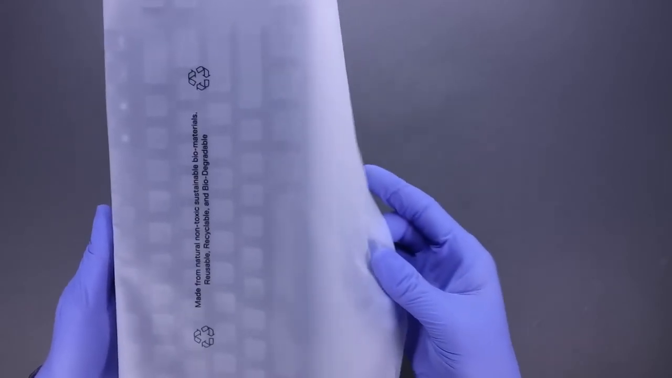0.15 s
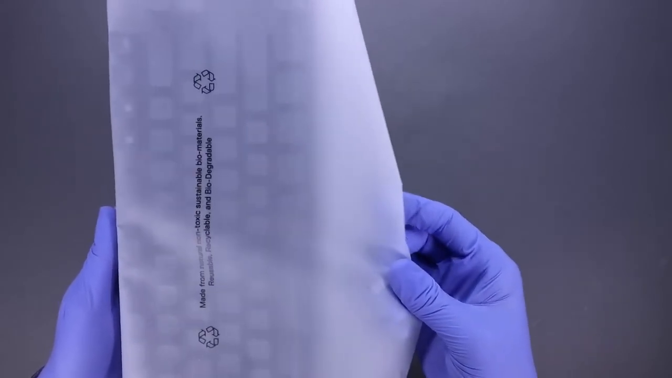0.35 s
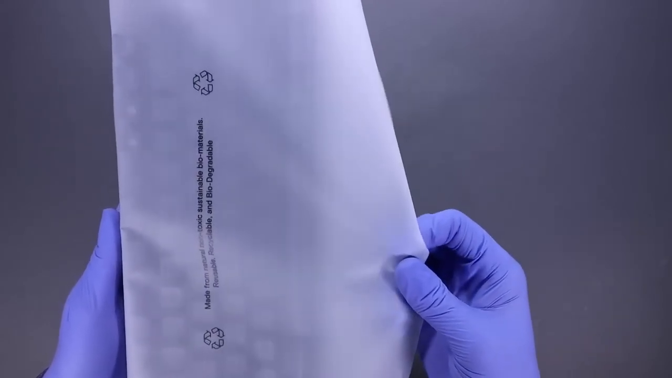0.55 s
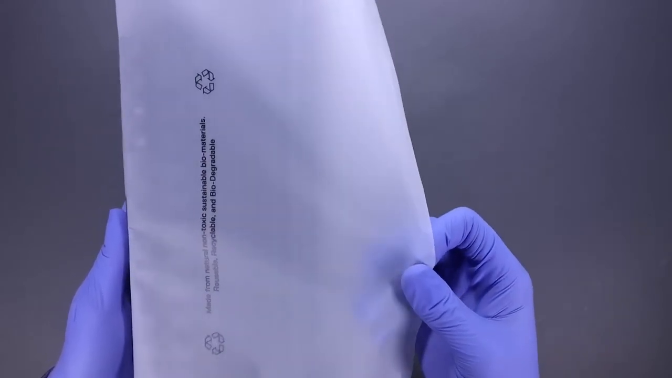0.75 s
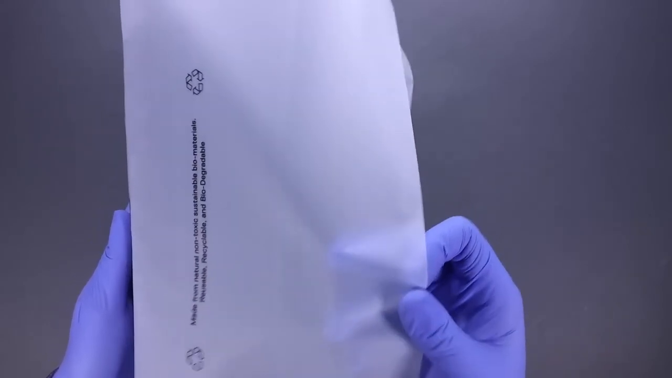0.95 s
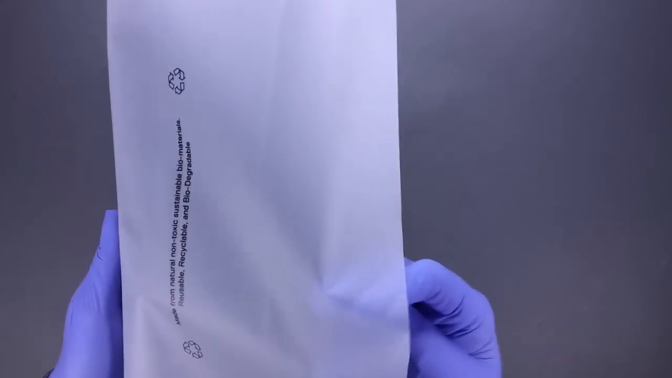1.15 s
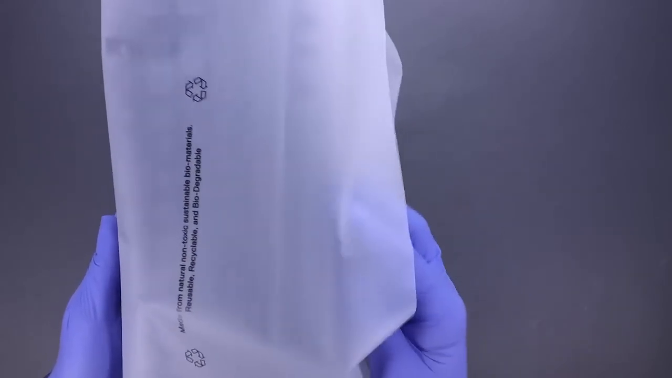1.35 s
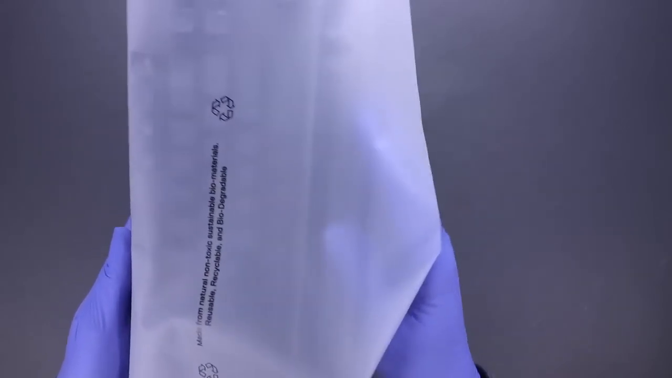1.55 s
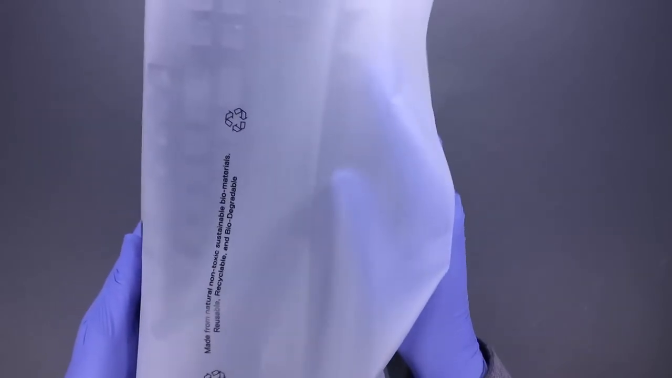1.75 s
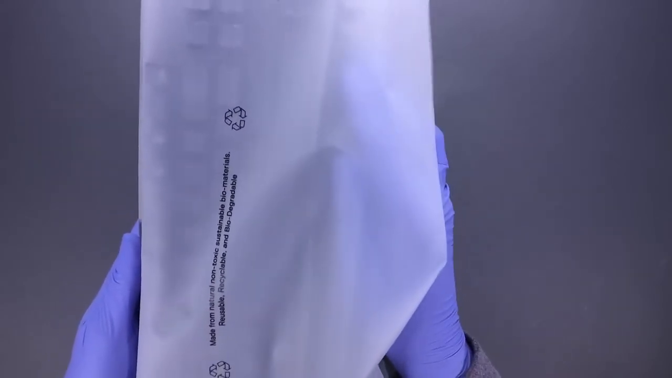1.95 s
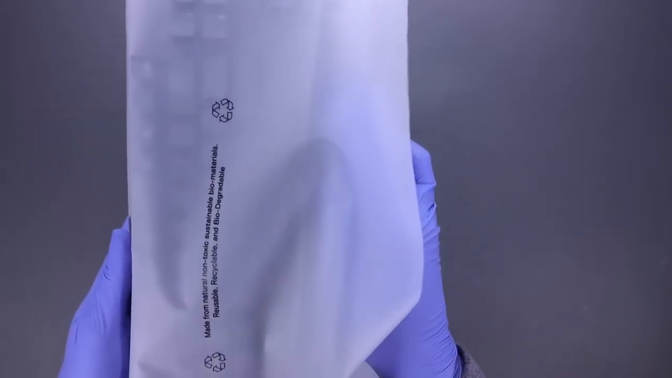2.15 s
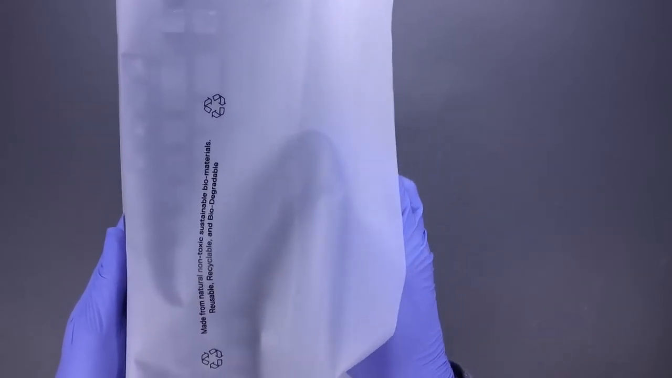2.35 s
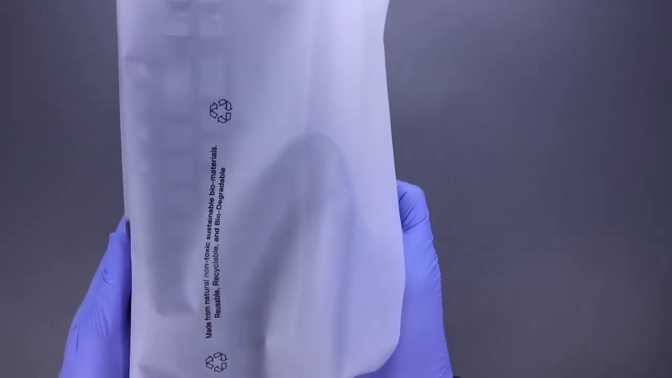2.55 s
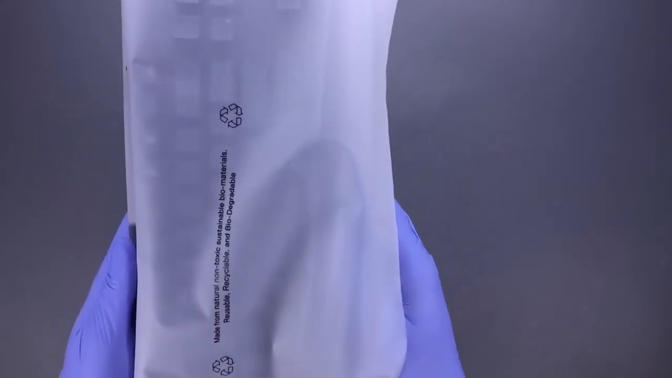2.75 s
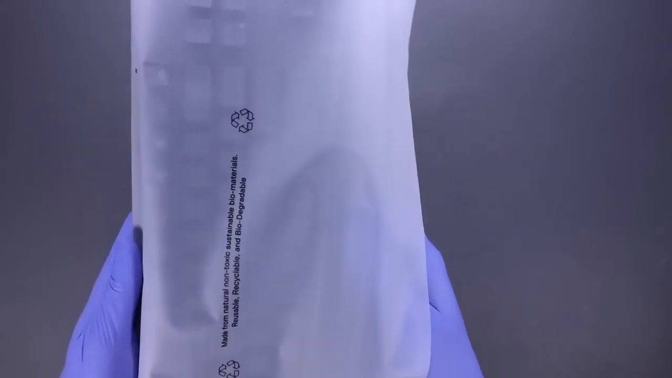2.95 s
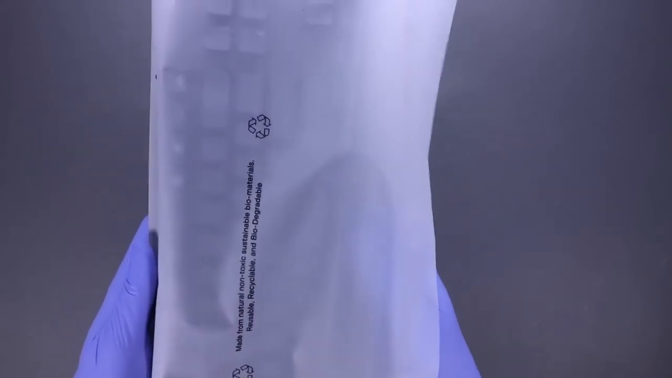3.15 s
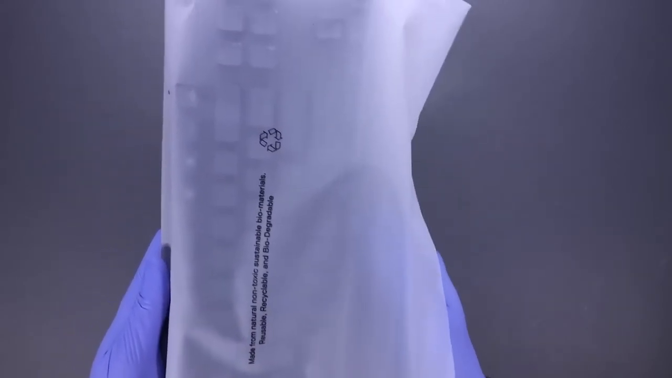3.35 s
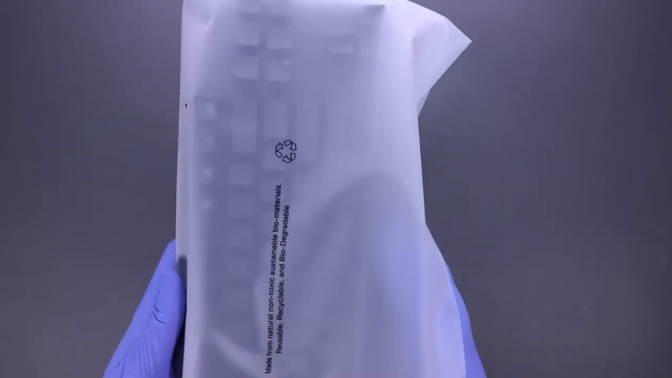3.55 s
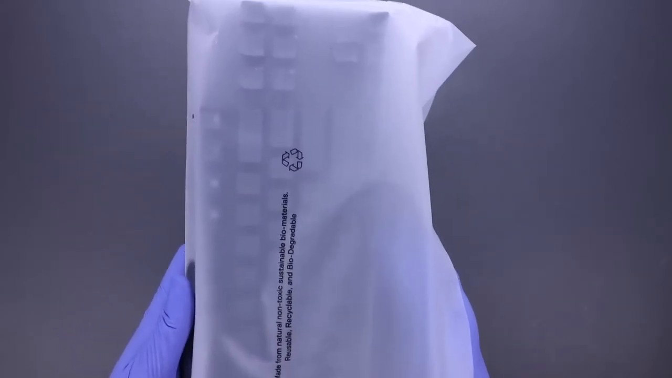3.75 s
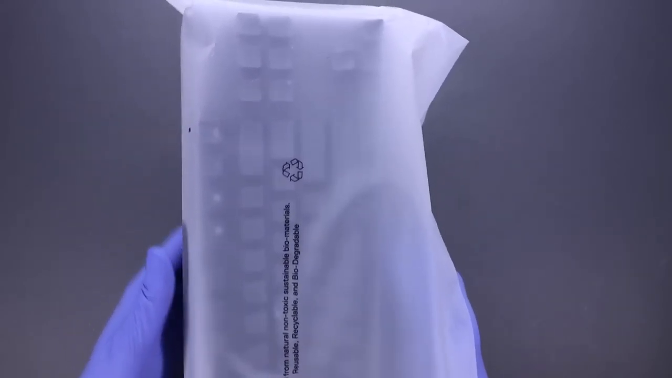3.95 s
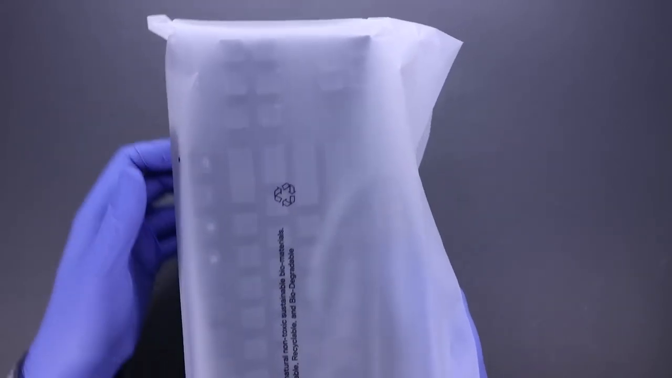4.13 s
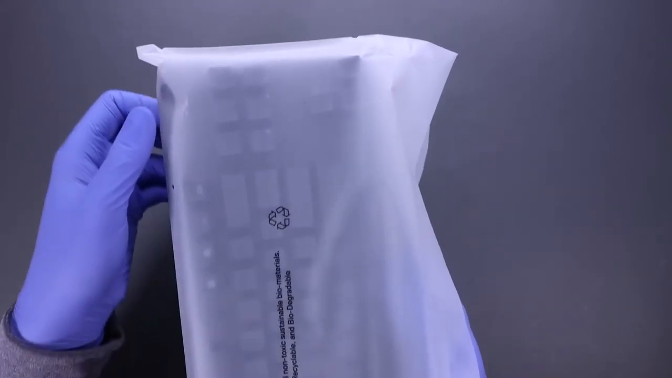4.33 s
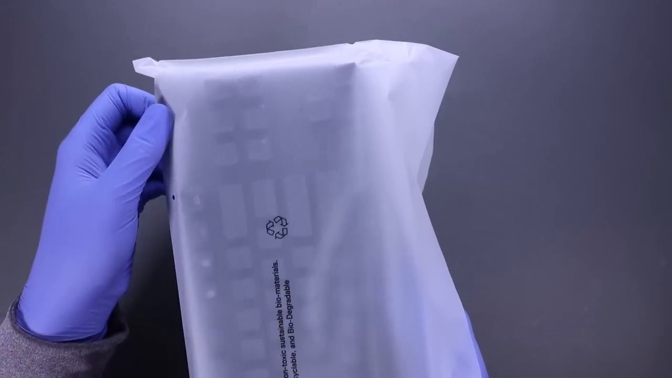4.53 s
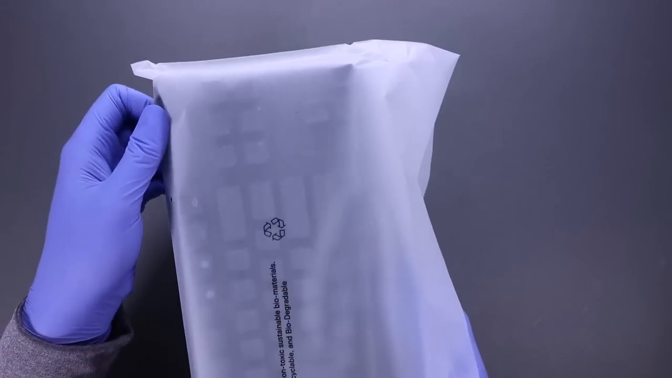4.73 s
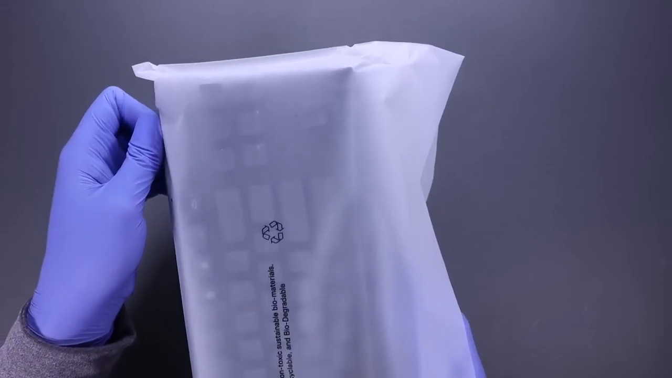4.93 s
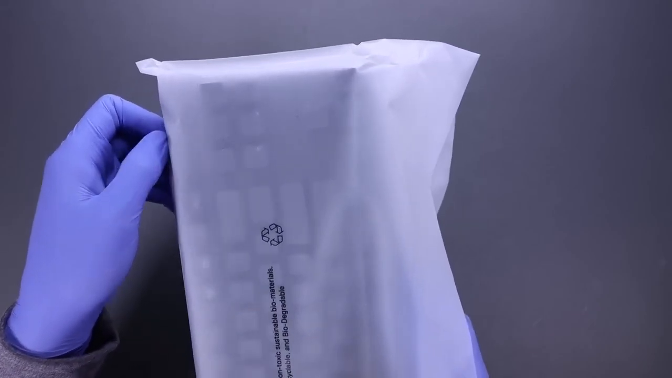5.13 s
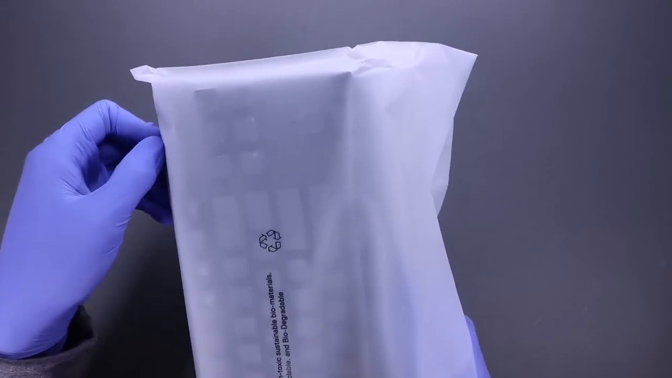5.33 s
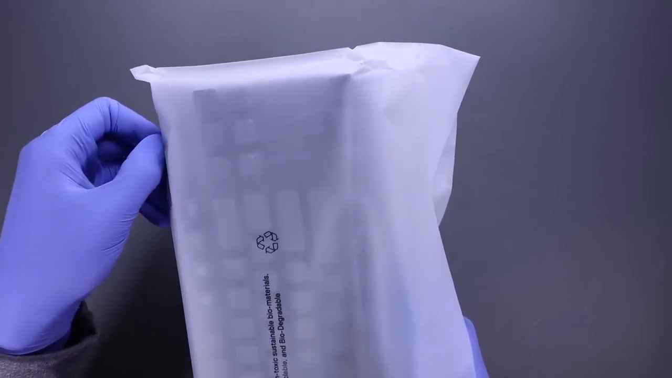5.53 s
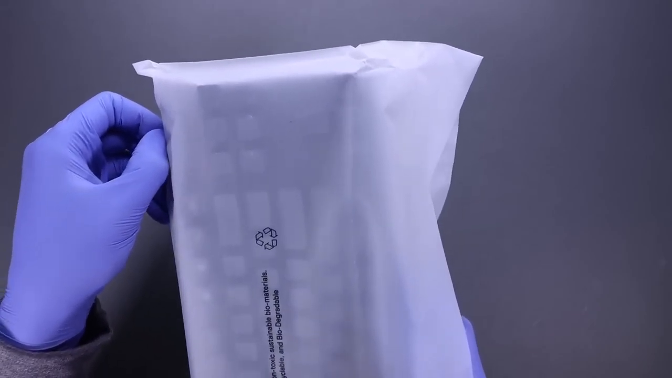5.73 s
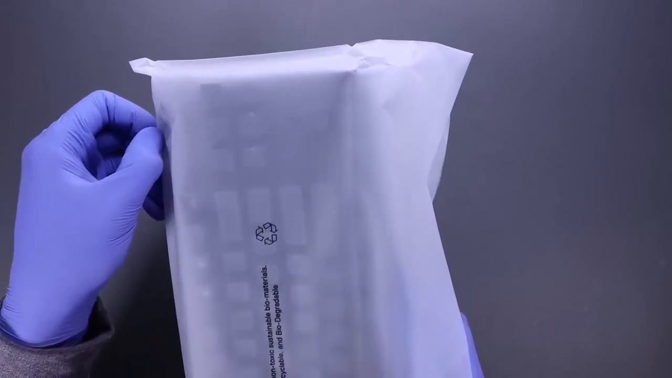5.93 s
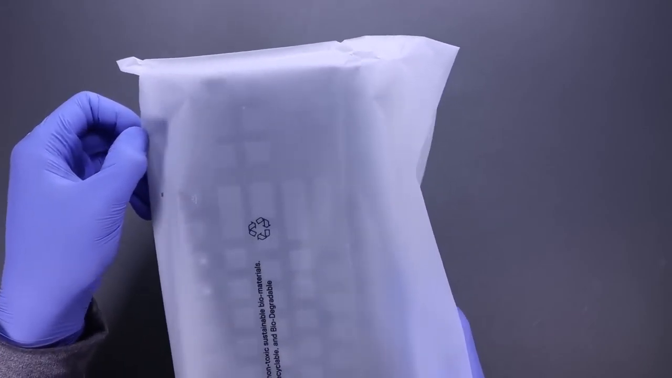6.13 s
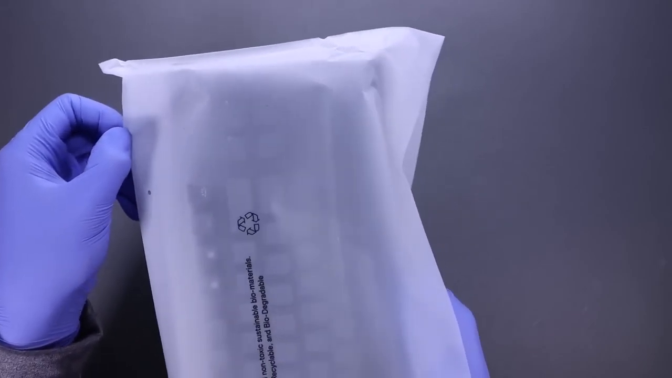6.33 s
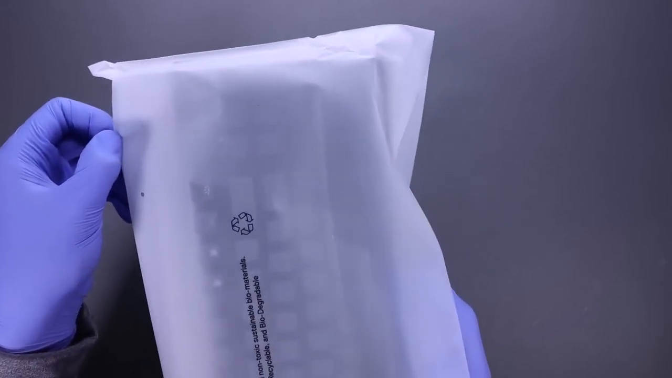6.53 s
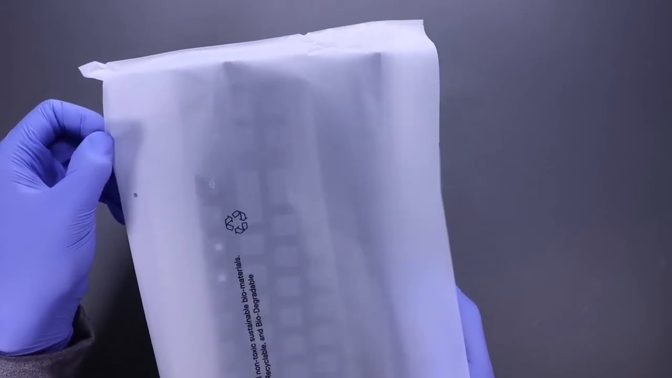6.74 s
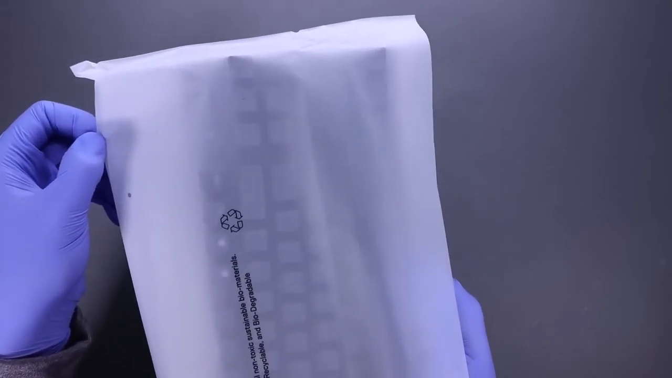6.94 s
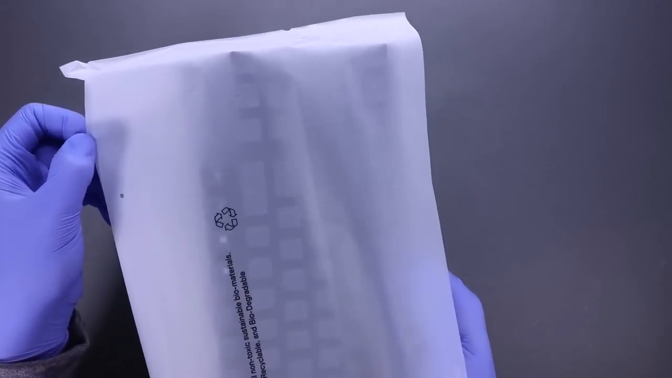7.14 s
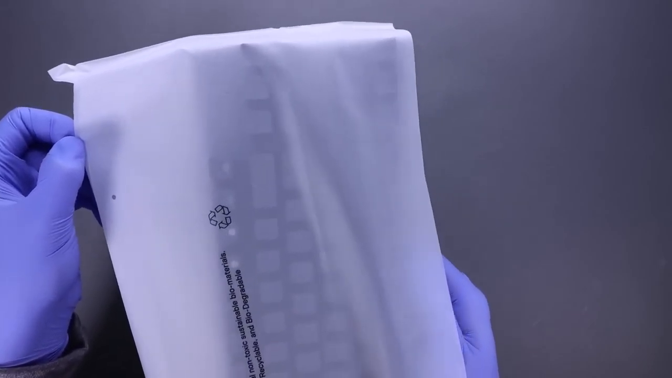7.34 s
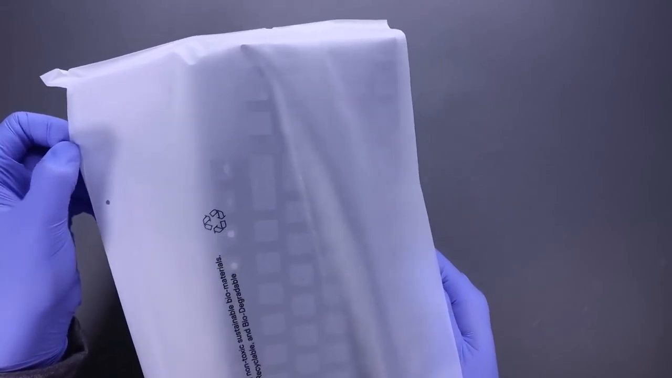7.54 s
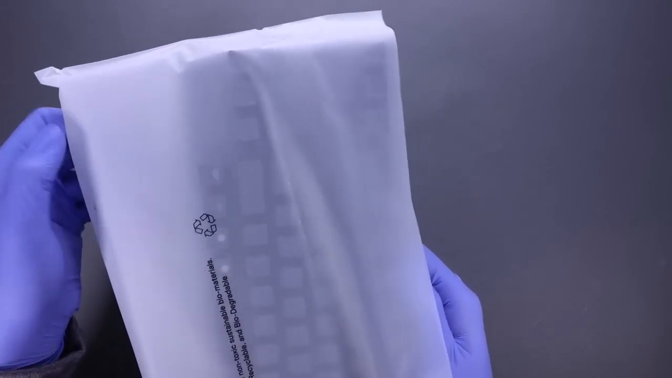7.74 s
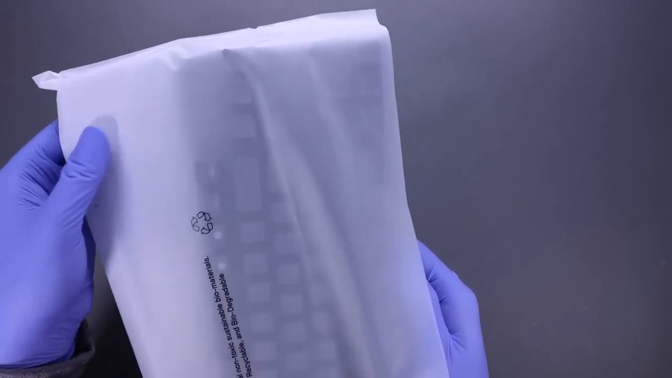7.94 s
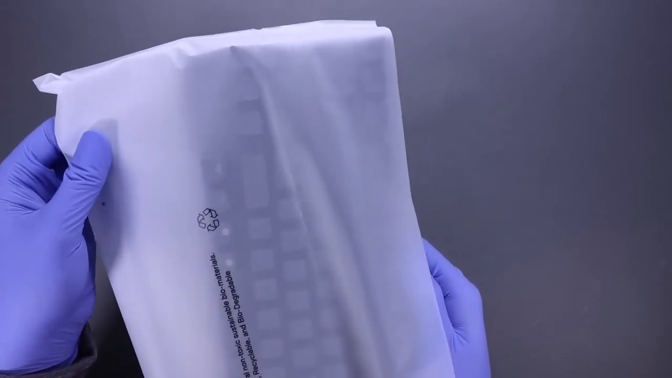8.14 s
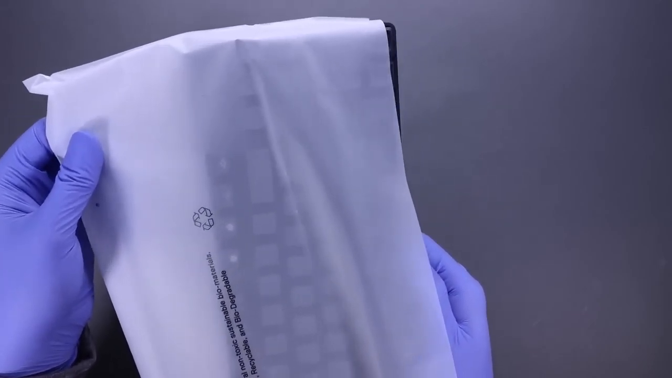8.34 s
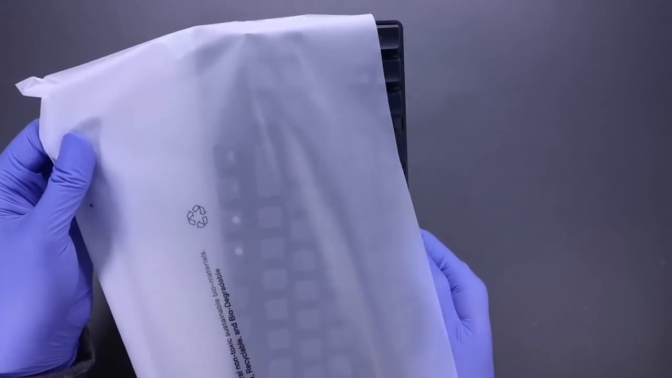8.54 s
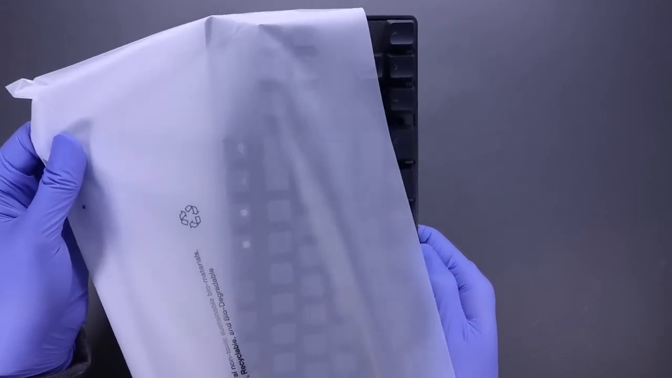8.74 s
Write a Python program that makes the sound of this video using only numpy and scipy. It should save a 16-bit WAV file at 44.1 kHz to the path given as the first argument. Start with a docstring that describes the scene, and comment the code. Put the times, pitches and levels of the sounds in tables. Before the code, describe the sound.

A thin plastic bag holding a keyboard is squeezed by gloved hands near a mono microphone in a small quiet room. Dense crisp snaps, glove swishes and low soft thuds come first, then thin into gentle rustling. A short gritty scrape bursts midway, followed by scattered ticks. Finally the keyboard slides out with steadier scraping, a faint hollow case resonance and clustered bright crackles.

```python
"""A thin, soft plastic film bag with a keyboard inside is handled by gloved hands, close to a mono microphone.
Over still air, gloves swish along the film as shaped noise; creases snap over as short decaying swings, which
a table top and a small quiet room answer. The film drags over the keys as gritty noise with lesser pops, and
the sheet pushes air in low lumps with soft thuds. Snaps thin out after the first 1.6 s; from 6.1 s the
keyboard starts to slide out, the scrape grows more even, its case sings, and bright snaps crowd the end."""
import sys
import numpy as np
from scipy import signal
from scipy.fft import rfft, irfft, next_fast_len
from scipy.io import wavfile
from scipy.ndimage import uniform_filter1d, map_coordinates

SR = 44100
rng = np.random.default_rng(int(sys.argv[2]) if len(sys.argv) > 2 else 0)


def persist_wave(psi):
    """Save psi, clipped to +-1, as 16-bit WAV."""
    counts = np.round(np.clip(psi, -1, 1) * 32767).astype(np.int16)
    wavfile.write(sys.argv[1], SR, np.atleast_2d(counts).T)


N = 391608


def amp(db):
    """Level: converts dB to an amplitude ratio."""
    return 10 ** (np.asarray(db) / 20)


def unit(x):
    """Normalization: scales a signal to rms 1."""
    return x / np.sqrt(np.mean(x ** 2) + 1e-20)


def along(points, hz):
    """Interpolation of (f/Hz, value) points on a logarithmic frequency axis."""
    f, value = np.transpose(points)
    return np.interp(np.log(hz + 1), np.log(f + 1), value)


def curves(rows):
    """Linear interpolation in time: one value per sample for each column after t/s."""
    s, *columns = np.transpose(rows)
    return [np.interp(np.arange(N) / SR, s, column) for column in columns]


def wobble(rate):
    """Slow random modulation: a smooth curve through rate random knots a second."""
    knots = rng.standard_normal(int(N * rate / SR) + 4)
    return map_coordinates(knots, [np.arange(N) * rate / SR])


def filtered(x, response):
    """Linear filtering: multiplies the spectrum of x by a response of frequency."""
    m = next_fast_len(N + SR // 2)
    return irfft(rfft(x, m) * response(np.fft.rfftfreq(m, 1 / SR)), m)[..., :N]


def friction(spectrum, patchy_db, grit_db, grit_rate):
    """Dry friction: many tiny slips of uneven strength, in drifting patches of colour, as noise of rms 1."""
    slips = rng.standard_normal(N) * amp(grit_db * np.clip(wobble(grit_rate), -2, 2))
    z = signal.stft(slips, nperseg=512)[2]
    across_bins = uniform_filter1d(rng.standard_normal(z.shape), 10, 0)
    colour = unit(uniform_filter1d(across_bins, 12, 1))
    patches = signal.istft(z * amp(patchy_db * colour), nperseg=512)[1][:N]
    return unit(filtered(patches, lambda hz: amp(along(spectrum, hz))))


def moving_resonance(x, path, lift_db, octaves):
    """Resonance: a band around a moving centre frequency is lifted, and the rms returned to 1."""
    hz, t, z = signal.stft(x, SR, nperseg=512)
    centre_hz = np.interp(t, *np.transpose(path))
    away = np.log2((hz[:, None] + 1) / centre_hz) / octaves
    return unit(signal.istft(z * amp(lift_db * np.exp(-away ** 2)), SR, nperseg=512)[1][:N])


# a stroke is STROKE_DB down one rise before or one fall after its peak
STROKE_DB, STROKE_SHAPE = 20, 1.5


def strokes(rows, rest_db):
    """Power addition: overlapping strokes and the resting level sum in power, for each of two layers, in dB."""
    s, db, over_db, rise, fall = np.transpose(rows)[..., None]
    t = np.arange(0, N + 64, 64) / SR
    distance = np.where(t < s, (s - t) / rise, (t - s) / fall)
    fade_db = STROKE_DB * distance ** STROKE_SHAPE
    levels = []
    for peak_db, rest in zip((db, db + over_db), rest_db):
        power = np.sum(amp(peak_db - fade_db) ** 2, 0) + amp(rest) ** 2
        levels.append(np.interp(np.arange(N) / SR, t, 10 * np.log10(power)))
    return levels


# a second pitch, as a ratio: above the first on broad (low) facets, below it on narrow (high) ones
NARROW_HZ, ABOVE, BELOW, SECOND_DB = 1522, 1.828, 0.616, -13


def pops(rows, count):
    """Snap-through buckling: a facet swings a few cycles at two pitches and sets off count smaller facets."""
    s, db, hz, ms, crack_db = np.transpose(rows)[..., None]
    ratio = np.where(hz < NARROW_HZ, ABOVE, BELOW)
    second_hz = hz * ratio * np.exp(0.13 * rng.standard_normal((len(s), 1)))
    t = np.arange(500) / SR
    phase = rng.uniform(0, 2 * np.pi, (len(s), 2, 1))
    life = np.clip(ms, .3, 6) * 0.00029  # s; the swing peaks nearly a third of the length in
    swing = t / life * np.exp(-t / life)
    # the facet's pitch is set a little off, up or down at random
    detune = 0.22 * t / life * np.sin(phase[:, 1])
    first = np.sin(2 * np.pi * hz * t + detune)
    second = amp(SECOND_DB) * np.sin(2 * np.pi * second_hz * t + phase[:, 0])
    body = (first + second) * swing
    body = body / np.abs(body).max(1, keepdims=True)
    crack = 0
    for low_hz in np.geomspace(1000, 13500, num=count):
        draw = rng.uniform(size=(len(s), 3, 1))
        f = low_hz * (1 + 0.36 * draw[:, 0])
        late = 0.00315 * draw[:, 1] ** 2 * (2000 / f) ** 0.907  # s; high facets tend to go first
        age = np.clip(t - late, 0, None) / life * (f / 3000) ** .35
        ring = np.sqrt(age) * np.exp(-age) * np.sin(2 * np.pi * (f * t + draw[:, 2]))
        crack = crack + amp(-4 * np.log2(f / 5000)) * ring
    at = np.round(s * SR).astype(int) + np.arange(len(t))
    sound = amp(db) * (body + amp(crack_db - 9.5) * crack)
    return np.bincount(at.ravel(), sound.ravel(), N + SR)[:N]


def small_pops(drive_db, mean_hz, over_db, count):
    """Random buckling: lesser creases pop at chance times, their level following the driving motion."""
    draw = rng.standard_normal((count, 3))
    chance = rng.uniform(size=(count, 2))
    s = chance[:, 0] * N / SR
    extra_db = over_db - 3.5 * np.log(1 - .9 * chance[:, 1])
    db = drive_db[(s * SR).astype(int)] + extra_db
    hz = mean_hz * np.exp(0.445 * draw[:, 0])
    ms = 1.78 * np.exp(0.15 * draw[:, 1])
    crack_db = -18 + 4 * draw[:, 2]
    return pops(np.transpose([s, db, hz, ms, crack_db]), count=5)


# spectrum of the still air: f/Hz, relative density level/dB
QUIET_SPECTRUM = [(20, 18), (80, -7), (300, -3.5), (1000, -50), (3000, -39.5), (16000, -70)]


def still_air():
    """Background noise: a steady, mostly low random pressure under everything."""
    return amp(-74.5) * friction(QUIET_SPECTRUM, patchy_db=1, grit_db=2.5, grit_rate=5.4)


# slides of a glove along the film:
# peak t/s, fine hiss level/dB, swish level over the hiss/dB, rise t/s, fall t/s
GLOVE_SLIDES = [(0.0, -61, -3, 0.03, 0.45), (0.06, -65.5, 6.5, 0.05, 0.069),
                (0.35, -75.5, 8.5, 0.084, 0.23), (0.651, -56, 3, 0.2, 0.069), (0.747, -62, 3.5, 0.03, 0.72),
                (1.059, -54, -4, 0.057, 0.062), (1.19, -52, -7, 0.052, 0.12), (1.6, -59, -10, 0.55, 0.4),
                (1.83, -55.5, -7.5, 0.52, 0.16), (2.03, -63, -2, 0.13, 0.11), (2.33, -64, 4, 0.47, 0.3),
                (2.48, -65, -6, .15, 0.19), (2.7, -67.5, -1, .1, .1), (2.83, -72, 3.5, 0.17, 0.13),
                (2.96, -63, -6.5, 0.11, 0.067), (3.055, -72.5, -3.5, .05, 0.059),
                (3.17, -71.5, 1, 0.069, 0.1), (3.27, -79, 17, 0.046, 0.044), (3.429, -66, 0.5, 0.096, 0.25),
                (3.568, -82, 10, 0.36, 0.21), (3.598, -59.5, 7.5, 0.05, 0.059),
                (3.727, -77.5, 12, 0.099, 0.074), (4.08, -64.5, 12, 0.083, 0.1),
                (4.154, -56.5, 0.5, 0.18, 0.55), (4.652, -81.5, 7.5, 0.04, 0.25),
                (5.068, -59.5, -0.5, 0.15, 0.044), (5.236, -61, -2, 0.16, 0.095),
                (5.619, -72, 8.5, 0.24, 0.026), (5.718, -67.5, 3, 0.068, 0.068),
                (6.019, -85, 18, 0.034, 0.06), (6.35, -61.5, 8.5, 0.22, 0.19),
                (6.389, -59.5, 9.5, 0.17, 0.072), (6.608, -71, 8.5, 0.11, 0.073),
                (6.88, -59.5, 4, 0.092, 0.11), (7.09, -80, 6.5, 0.079, 0.29),
                (7.367, -62.5, 8.5, 0.13, 0.18), (7.49, -61.5, 6, 0.058, 0.083), (7.834, -62, 2, 0.19, 0.2),
                (7.9, -61, -2, 0.05, 0.056), (8.09, -60, 4, 0.093, 0.11), (8.516, -62, 0, 0.21, 0.08),
                (8.62, -60, 9, 0.032, 0.1), (8.8, -55, 8.5, 0.16, 0.059)]
SLIDE_REST_DB = (-91.5, -85.5)  # hiss and swish with the hands at rest
# spectra of the swish, the fine hiss and the finest hiss: f/Hz, relative density level/dB
SWISH_SPECTRUM = [(1500, -14.5), (2800, 0), (4000, -3.5), (5300, -2.5), (6500, -10.5), (9000, -33.5)]
HISS_SPECTRUM = [(3500, -23), (5500, -7.5), (7600, -0.5), (9500, -10.5), (12000, -20.5), (16000, -34)]
SHEEN_SPECTRUM = [(6000, -26.5), (9000, -9.5), (12000, -8.5), (14500, -12.5), (16000, -16)]
# resonance of the pocket of air between glove and film: t/s, f/Hz
POCKET_PATH = [(.55, 4700), (.8, 3500), (1.05, 5150), (1.252, 4440), (1.8, 2870), (2.15, 2730), (2.3, 3900),
               (2.5, 4380), (2.65, 3520), (3.27, 5400), (3.6, 3700), (8.88, 4100)]
# the finest hiss relative to the fine hiss: t/s, level/dB
SHEEN_OVER_HISS = [(0, -3), (.65, 1.5), (1.2, -1), (1.65, 1), (1.9, -8), (2.1, -4), (2.3, 0), (2.8, 5.5),
                   (2.96, -3.5), (3.3, 0), (4.2, 6), (5.7, 0.5), (6.3, -5.5), (7.5, -3), (7.9, 5.5),
                   (8.3, -4.5), (8.88, -2)]


def gloves():
    """Sliding friction: smooth rubber on smooth film gives fine, even noise, coloured by a pocket of air."""
    hiss_db, swish_db = strokes(GLOVE_SLIDES, SLIDE_REST_DB)
    rubbing = friction(SWISH_SPECTRUM, patchy_db=1.7, grit_db=2.0, grit_rate=300)
    swish = amp(swish_db) * moving_resonance(rubbing, POCKET_PATH, lift_db=6.5, octaves=.15)
    hiss = amp(hiss_db) * friction(HISS_SPECTRUM, patchy_db=1.9, grit_db=2.0, grit_rate=670)
    sheen_db = hiss_db + curves(SHEEN_OVER_HISS)[0]
    sheen = amp(sheen_db) * friction(SHEEN_SPECTRUM, patchy_db=1.9, grit_db=1.0, grit_rate=640)
    # tiny creases under the finger tips
    nicks = small_pops(hiss_db, mean_hz=7000, over_db=6.5, count=90)
    return swish + hiss + nicks + sheen


# film over the keys: peak t/s, scrape level/dB, hollow level over the scrape/dB, rise t/s, fall t/s
FILM_DRAGS = [(0.059, -60, -2, 0.045, 0.043), (0.235, -63, -2.5, 0.31, 0.19), (0.327, -58, 4, 0.049, 0.21),
              (0.594, -61.5, 3.5, 0.11, 0.59), (0.971, -53, -6, 0.25, 0.042),
              (1.172, -54.5, 0, 0.35, 0.042), (1.438, -57, -4, 0.83, 0.29), (1.562, -59, 5.5, 0.072, 0.142),
              (1.845, -64, -1.5, 0.042, 0.16), (2.096, -66.5, -5.5, 0.1, 0.95),
              (2.6, -56, -11.5, 0.1, 0.19), (2.7, -70, -12, 0.11, 0.65), (2.775, -67, 1, 0.048, 0.05),
              (2.991, -72, -7, 0.53, 0.11), (3.27, -53, -2, 0.065, 0.067), (3.39, -65, 6, 0.11, 0.12),
              (3.47, -59.5, -15, 0.096, 0.092), (3.593, -42, -7, 0.024, 0.04),
              (3.676, -63.5, -9, 0.54, 0.12), (3.857, -69, -10, 0.055, 0.13),
              (4.078, -52.5, -17.5, 0.098, 0.38), (4.531, -70, -3, 0.041, 0.33),
              (4.829, -70.5, -24, 0.043, 0.39), (5.106, -63, -5, 0.15, 0.3),
              (5.716, -53.5, -5.5, 0.16, 0.083), (6.013, -74, -3, 0.04, 0.037),
              (6.41, -44.5, -4.5, 0.34, 0.074), (6.609, -53, -0.5, 0.23, 0.089),
              (6.904, -48.5, -5, 0.15, 0.077), (7.088, -64.5, 5.5, 0.081, 0.91),
              (7.466, -47, -9, 0.27, 0.13), (7.823, -57, 0.5, 0.15, 0.19), (8.112, -56, -2, 0.11, 0.16),
              (8.477, -51.5, -4, 0.23, 1), (8.8, -45.5, -21, 0.24, 0.082)]
DRAG_REST_DB = (-96.5, -91)  # scrape and hollow layers with the hands at rest
# spectra of loose film folding, film scraping keys, hollow rustle and
# the air in the keyboard case: f/Hz, relative density level/dB
CRUMPLE_SPECTRUM = [(350, -20), (600, 3.5), (850, 4.5), (1400, -5.5), (2200, -3.5), (3500, -7),
                    (8000, -22.5)]
SCRAPE_SPECTRUM = [(350, -15.5), (650, -2), (850, 2), (1250, -3.5), (1900, 1.5), (2900, -7.5), (4500, -22),
                   (9000, -23), (16000, -55)]
HOLLOW_SPECTRUM = [(120, -33.5), (220, -6.5), (320, -0.5), (480, 2), (620, -7), (800, -6.5), (1200, -50)]
CASE_SPECTRUM = [(250, -56), (400, -13.5), (480, -7.5), (550, -16), (750, -52.5)]
# resonance of the bulge of slack film as it crumples: t/s, f/Hz
BULGE_PATH = [(0, 2200), (.8, 1700), (1.3, 900), (2.4, 1465), (3.0, 1400), (3.27, 2300), (3.36, 746),
              (3.55, 2100), (4.051, 1790), (6.2, 1880)]
# how far the keyboard slides rather than the film crumples: t/s, share/(0 to 1)
SLIDING_SHARE = [(0, 0.37), (6.1, 0.3), (6.5, 0.95), (8.88, 0.95)]


def drag():
    """Friction and cavity resonance: film crumples in lumps; with sliding it scrapes evenly and the case sings."""
    scrape_db, hollow_db = strokes(FILM_DRAGS, DRAG_REST_DB)
    share = np.clip(curves(SLIDING_SHARE)[0], 0, 1)
    loose = np.sqrt(1 - share)
    folding = friction(CRUMPLE_SPECTRUM, patchy_db=1.5, grit_db=4.5, grit_rate=110)
    crumple = .8 * loose * moving_resonance(folding, BULGE_PATH, lift_db=9, octaves=.16)
    scrape = np.sqrt(share) * friction(SCRAPE_SPECTRUM, patchy_db=1, grit_db=1.0, grit_rate=250)
    rustle = loose * friction(HOLLOW_SPECTRUM, patchy_db=1.5, grit_db=3, grit_rate=90)
    singing = .75 * share ** 2 * friction(CASE_SPECTRUM, patchy_db=1.5, grit_db=3.5, grit_rate=14)
    crinkle = small_pops(scrape_db - 5 * share, mean_hz=1223, over_db=6.5, count=1000)
    ticks = small_pops(hollow_db - 6 * share, mean_hz=600, over_db=6, count=300)
    return amp(scrape_db) * (crumple + scrape) + amp(hollow_db) * (rustle + singing) + crinkle + ticks


# creases that snap over, some on two facets at once:
# t/s, peak level of the swing/dB, f/Hz, length/ms (held to 0.3-6), relative level of the bright crack/dB
CREASE_SNAPS = [(.0373,-34,2530,0.44,-14),(.0374,-53,500,3.5,-30),(.0524,-37,2530,1.7,-5),(.0525,-43.5,450,4.4,-30),(.0716,-40.5,476,2.1,0),(.1269,-43,776,2.4,-17),
                (.1504,-38.5,2140,1.5,-21),(.1505,-38.5,460,2.1,-24),(.199,-47,2030,1.2,-15),(.2074,-49,2440,2.4,-15),(.2233,-34.5,880,2.1,-8.5),(.298,-42,610,2.9,-32),
                (.3055,-30,2440,2.2,-12),(.3114,-35,596,3.1,-34),(.3115,-27.5,3080,0.24,6.5),(.3413,-37,2113,1.6,-16),(.3554,-27,2400,1.5,-5),(.3555,-28,503,3.6,-28),
                (.3676,-42,850,3.2,-23),(.3859,-46,408,2.1,6),(.424,-47,503,4,-30),(.4655,-38.5,3060,1,-29),(.5248,-39.5,4330,1.1,-22),
                (.568,-44,550,4.9,-30),(.5939,-23,4830,0.27,-2),(.711,-37,1316,6.7,-36.5),(.7192,-14.5,3900,0.44,-23.5),(.7193,-17,7340,0.29,-14),(.7726,-39,800,2.5,2),
                (.8359,-31,770,3.7,-7.5),(.9131,-39.5,650,3.3,-25),(.923,-43,796,2.5,-8),(.982,-38,656,3.8,-33),(1.0505,-41,1300,2.2,-15),(1.0825,-32.5,780,3.1,-27),(1.0928,-48,1300,1.8,-20),(1.1042,-38,950,2.4,-22),(1.1225,-38,800,3.3,-10),
                (1.1666,-28,1527,2.35,-16),(1.1667,-31,915,4,-22),
                (1.2512,-35,880,6.9,-35),(1.3065,-38.5,790,2.2,-24),(1.3828,-39.5,820,2.3,-16.5),(1.403,-44,700,3,-25),(1.4293,-38.5,800,3.9,-17.5),
                (1.4452,-40,1380,3.2,-22),(1.4645,-27.5,1110,1.6,-5),(1.4646,-33.5,2520,0.74,-8),(1.4988,-32.5,770,1.46,-5),(1.5287,-46,700,3,-25),(1.5558,-22,690,4.2,-50),(1.573,-43,805,3,-30),(1.59,-47,1000,3.5,-30),
                (1.647,-49.5,2740,3.6,5.5),(1.8461,-35.5,1370,1.2,-1.5),(1.9205,-48.5,292,6.7,-5),(2.0712,-38,860,0.76,-0.5),(2.0974,-40,730,3.4,-34),
                (2.1195,-46,464,4.2,-27),(2.296,-45,420,12,-26),(2.2961,-43,2100,3.8,-2),(2.4128,-49.5,830,2.9,-21),(2.6336,-38.5,1650,1.4,-28),(2.7719,-51,430,6.8,-40),(2.772,-56,1580,4.7,-30),
                (2.9922,-48.5,590,4.1,-34),(3.2644,-38,940,4.5,-29),(3.2714,-38,695,3,-25),(3.5794,-38,2270,5.9,-0.5),
                (3.5896,-41,2110,4.2,-15),(3.6017,-30,2100,1.4,-10),(3.6397,-46,1510,2.2,-17),(4.0807,-38.5,806,3.6,-13),
                (4.1633,-35,1690,2.3,-25),(4.184,-57,1210,1.7,-20),(4.1954,-35.5,2680,1.7,-1),(4.253,-50,1100,2,-12),(4.332,-46,1200,1,-15),(4.4261,-33.5,1890,0.43,-1),(4.5281,-40.5,715,8,-2),(4.5282,-41.5,2040,1.6,-5),
                (4.6068,-48,268,5.8,-27),(4.6069,-49.5,1884,2.2,-20),(4.6927,-58,665,6,-6),(4.7307,-55,367.5,6.8,-13),(4.75,-60,1670,1.5,-2),(4.7804,-62.5,1650,4,4),(4.8187,-35.5,980,5,-23),(4.9578,-50,653,3.3,-7),(5.044,-50,1860,5,-3),(5.0629,-33,1950,2.1,-2),(5.063,-32.5,2840,1.5,2.5),
                (5.111,-38.5,880,2,-25),(5.3325,-58,754,3.1,-19),(5.366,-56.5,686,1.8,-19),(5.6208,-38.5,1180,1.15,-1),(5.6815,-32,960,4.2,-34),(5.6816,-27.5,2000,0.61,-34),(5.7272,-41.5,1430,2,3.5),
                (5.8832,-43,1920,0.95,-13),(6.0004,-38.5,1970,1.37,5),(6.0005,-29.5,3400,0.38,-11),(6.1023,-44.5,467,6.6,-0.5),(6.1234,-50,1880,3.9,-30),
                (6.1484,-31.5,970,1.3,-6),(6.2265,-27.5,1920,0.87,-14),(6.2632,-32,1730,1.6,-25),(6.3498,-31,770,5.1,-1.5),(6.3499,-34,2620,2.3,-10),
                (6.3618,-24,4800,.65,4.5),(6.3824,-27.5,1300,1.5,-1),(6.412,-37,1600,3,-16),(6.42,-34,4370,1.6,8),
                (6.4554,-28.5,1980,1.8,3),(6.4555,-37.5,3140,2,3),(6.8083,-23.5,3340,0.45,3),(6.8084,-22,7560,0.35,-4),(6.8666,-28.5,2240,0.75,-19),(6.911,-45,2110,1.7,10),
                (7.1745,-45.5,952,2.6,-30),(7.2331,-34,720,2.5,-36),(7.2956,-30,1730,2.2,-21),(7.4311,-29.5,850,3.7,-4),(7.4312,-33,1710,3,-23),
                (7.7038,-49,666,2,-4),(7.7852,-39,1850,2,11),(7.7853,-30,2980,0.72,0),(7.803,-15,2000,0.74,1.5),(7.84,-27,1390,0.76,-4),(7.8789,-41,1400,4,-12),
                (7.885,-31,14000,1.5,-8),(8.0307,-43.5,554,3.8,1),(8.0908,-34.5,375,5.4,-32),(8.0987,-27,2670,0.94,6),
                (8.1602,-25,1860,4,0.5),(8.1603,-25.5,590,3.6,-30),(8.2076,-26.5,1580,0.46,-14),(8.2453,-40.5,935,1.7,6.5),(8.415,-53,11000,0.32,-7),
                (8.457,-39.5,12400,0.89,4),(8.482,-38,7600,0.65,1),(8.504,-41,11460,0.67,11),(8.5265,-35.5,4330,0.88,5.5),
                (8.537,-41,11600,0.45,7),(8.556,-44,7500,.8,-6),(8.6073,-33.5,7170,1.2,5),(8.6074,-37,2560,2.8,-17),(8.6135,-26,4340,0.68,0.5),
                (8.6237,-24.5,1800,1.4,3),(8.7738,-27,2040,0.91,7.5)]


def crease_snaps():
    """Snap-through buckling: each larger crease flips over with a short pop and a bright crack."""
    return pops(CREASE_SNAPS, count=18)


# reverberation time of the room: f/Hz, T60/s
ROOM_T60 = [(300, 0.076), (2000, 0.064), (10000, 0.076)]


def room(x):
    """Reflection and reverberation: a short tail, shortest near 2 kHz, and a dull bounce off the table."""
    hz, t, z = signal.stft(rng.standard_normal(SR // 4), SR, nperseg=256)
    decay = amp(-60 * t / along(ROOM_T60, hz)[:, None])
    tail = signal.istft(z * decay, SR, nperseg=256)[1]
    delayed = np.pad(x, (90, 0))  # samples, about 2 ms
    late = signal.fftconvolve(delayed, tail / np.linalg.norm(tail))[:N]
    # delayed by 12 ms, first-order low-pass at 5 kHz
    table = filtered(x, lambda f: np.exp(-2j * np.pi * f * 0.012) / (1 + 1j * f / 5000))
    return amp(-10.0) * late + amp(-24) * table


# heaves of the sheet and its load:
# peak t/s, push level/dB, thud level over the push/dB, rise t/s, fall t/s
SHEET_HEAVES = [(0.33, -60, 3, 0.051, 0.16), (0.61, -55, -15.5, 0.074, 0.091),
                (0.79, -58.5, 0, 0.29, 0.094), (0.917, -49.5, -9, 0.042, 0.21), (1.0, -58, 0, 0.043, 0.046),
                (1.15, -51, -13.5, 0.055, 0.2), (1.32, -50, -7.5, 0.058, 0.33),
                (1.55, -60, -3, 0.073, 0.078), (1.873, -52, -21, 0.11, 0.2), (2.07, -68, -28, 0.033, 0.55),
                (3.461, -65, 1.5, 0.21, 0.074), (3.602, -64, 16, 0.045, 0.043), (4.191, -76, 8, 0.11, 0.09),
                (4.336, -75.5, 3.5, 0.04, 0.64), (6.454, -60, 7.5, 0.23, 0.05),
                (6.825, -72.5, -0.5, 0.046, 0.38), (7.793, -52, -5, 0.14, 0.19),
                (8.097, -48.5, 3.5, 0.073, 0.13), (8.54, -63.5, 10.5, 0.025, 0.061),
                (8.631, -56.5, -4, 0.13, 0.12)]
HEAVE_REST_DB = (-76.5, -82.5)  # push and thud with the hands at rest
# spectra of the pushed air and of the load shifting in the hands: f/Hz, relative density level/dB
PUSH_SPECTRUM = [(10, 5), (25, 12), (45, 2), (65, -16.5), (110, -54.5)]
THUD_SPECTRUM = [(35, -33.5), (65, 4.5), (100, -2), (160, -8.5), (260, -17.5), (500, -38.5)]


def flex():
    """Air displacement: the moving sheet pushes slow lumps of air, and the load shifts with soft thuds."""
    push_db, thud_db = strokes(SHEET_HEAVES, HEAVE_REST_DB)
    push = amp(push_db) * friction(PUSH_SPECTRUM, patchy_db=1.5, grit_db=4.0, grit_rate=37)
    thud = amp(thud_db) * friction(THUD_SPECTRUM, patchy_db=-4, grit_db=-1.0, grit_rate=28)
    return push + thud


def scene():
    """Superposition: snaps with their echoes over the rubbing and the still air, alike in both channels."""
    snaps = crease_snaps()
    mono = still_air() + gloves() + drag() + snaps + room(snaps) + flex()
    return np.array([mono, mono])


def record(dry):
    """Band limitation: nothing is kept from 15.8 kHz upward."""
    return filtered(dry, lambda hz: hz < 15800)


dry = scene()
out = record(dry)
persist_wave(out)
```